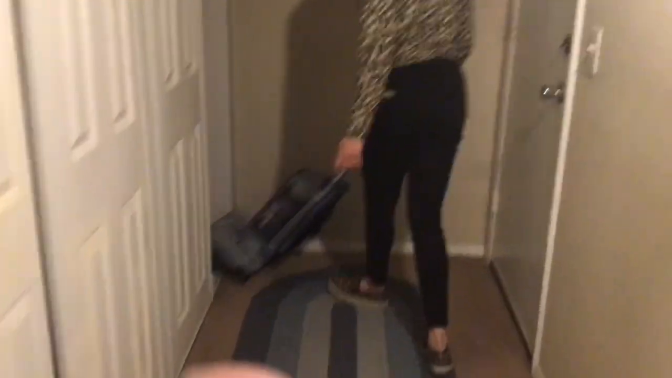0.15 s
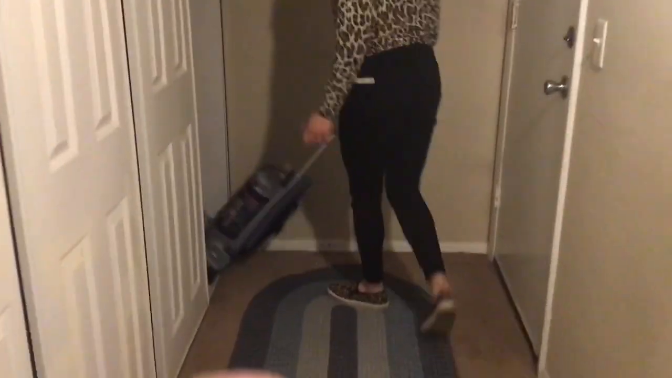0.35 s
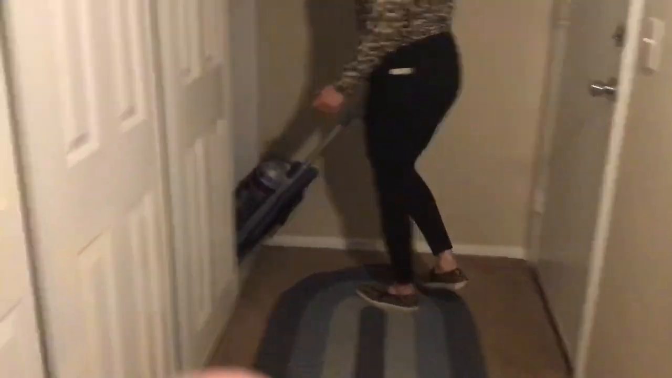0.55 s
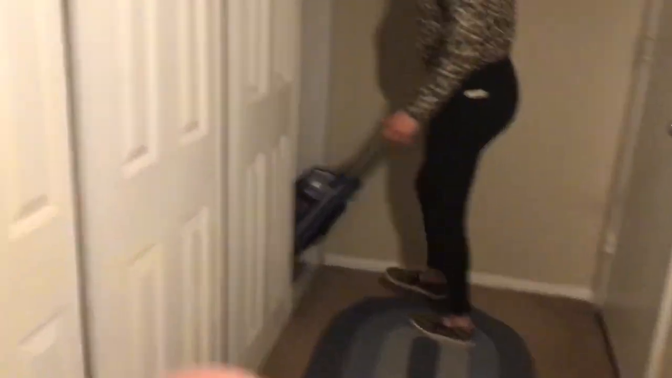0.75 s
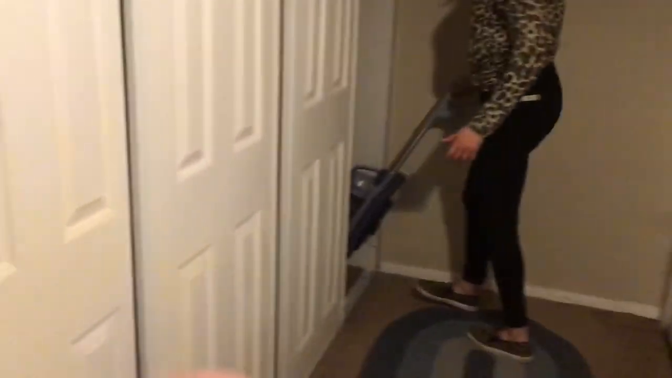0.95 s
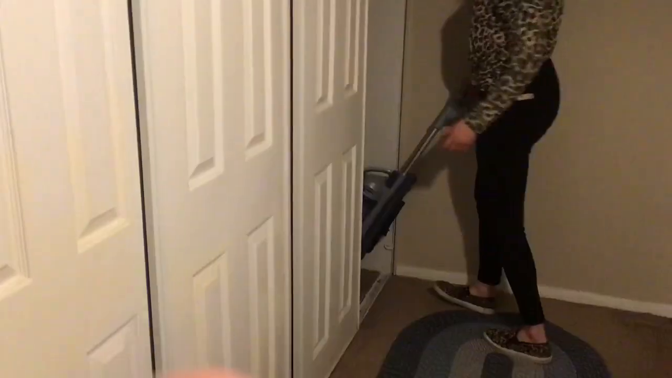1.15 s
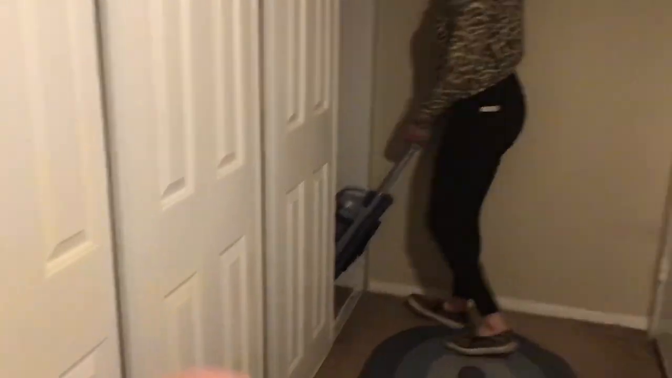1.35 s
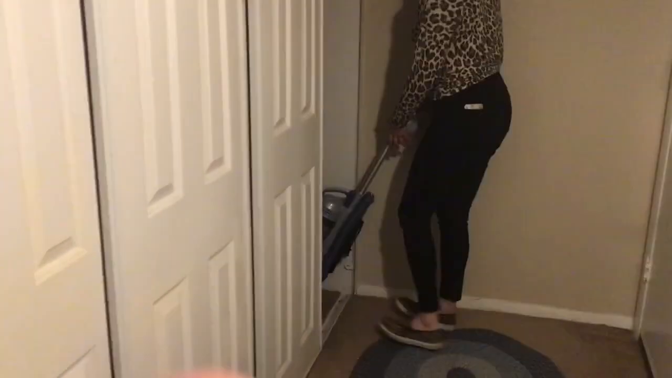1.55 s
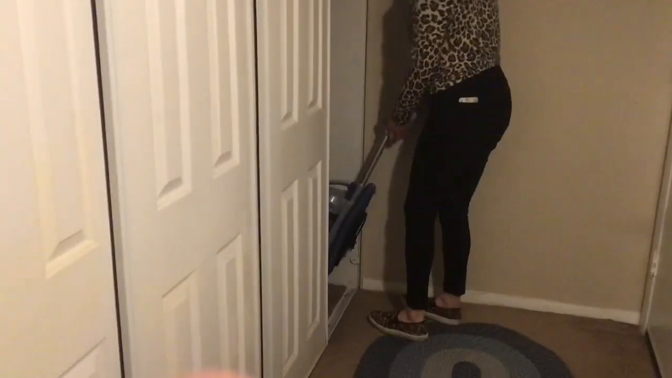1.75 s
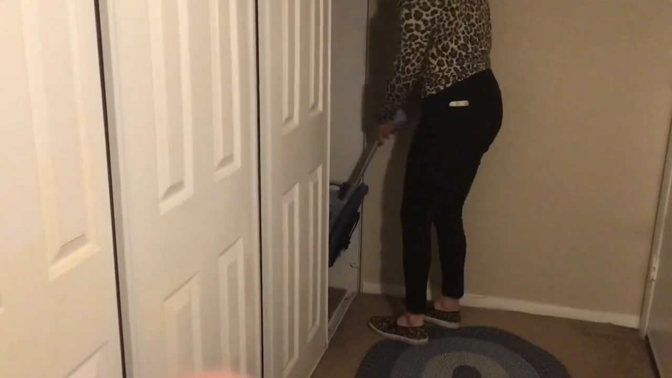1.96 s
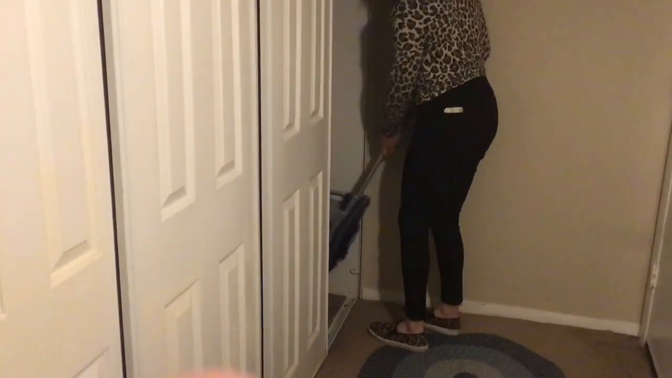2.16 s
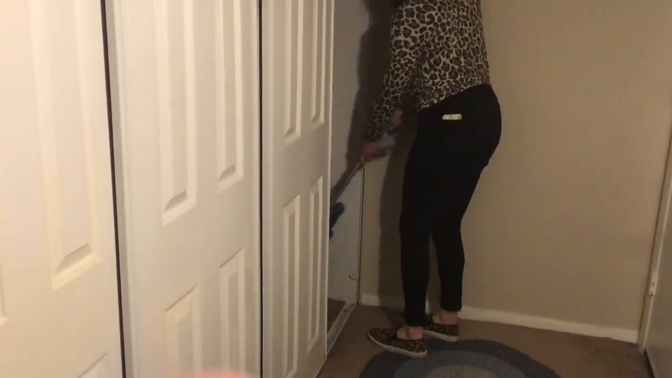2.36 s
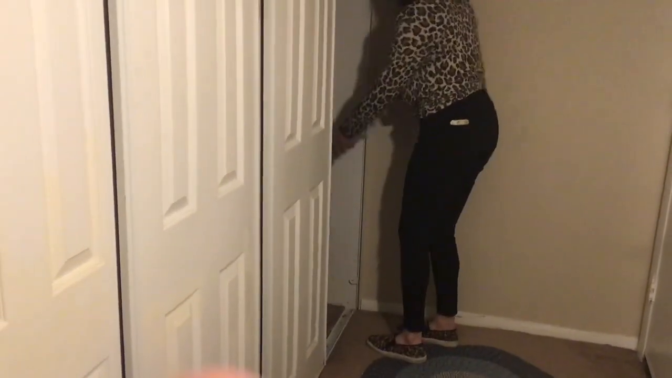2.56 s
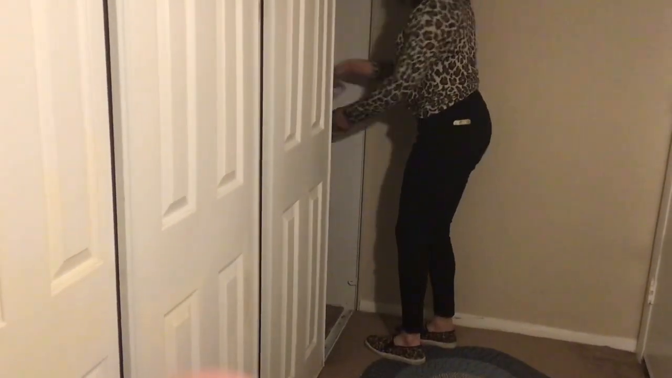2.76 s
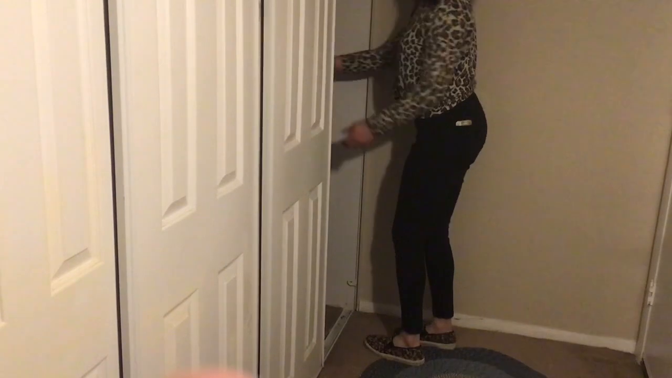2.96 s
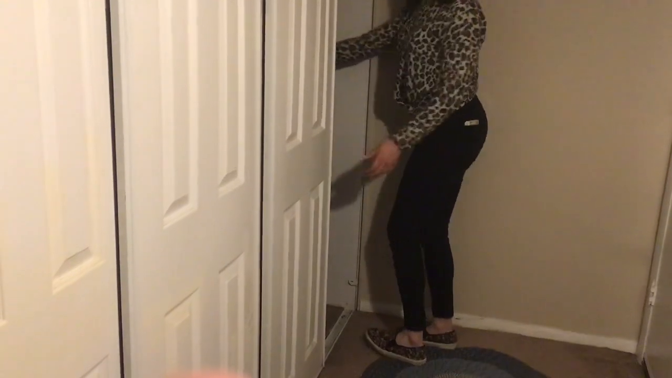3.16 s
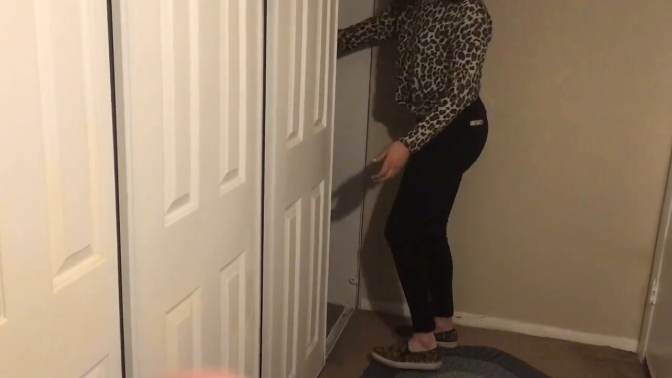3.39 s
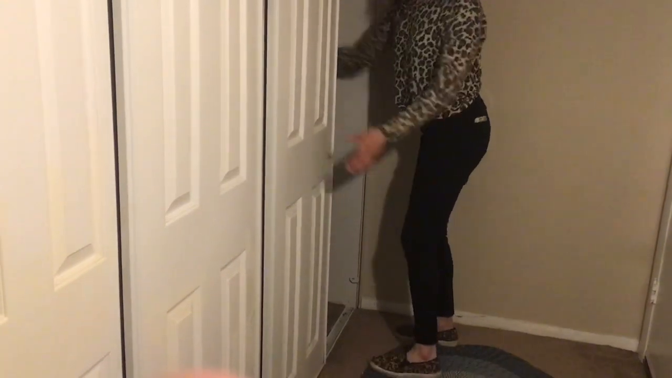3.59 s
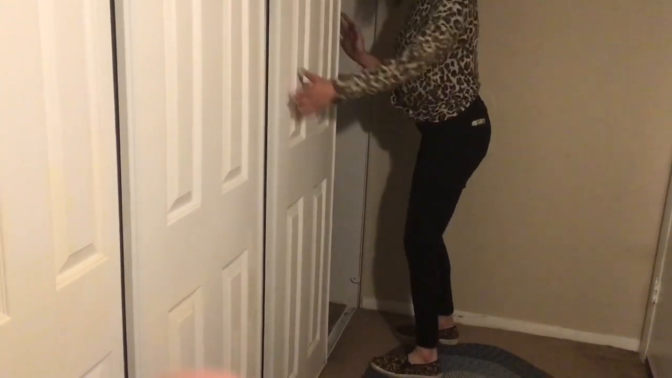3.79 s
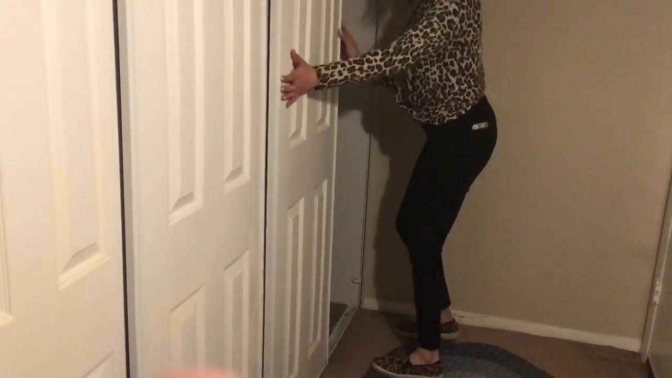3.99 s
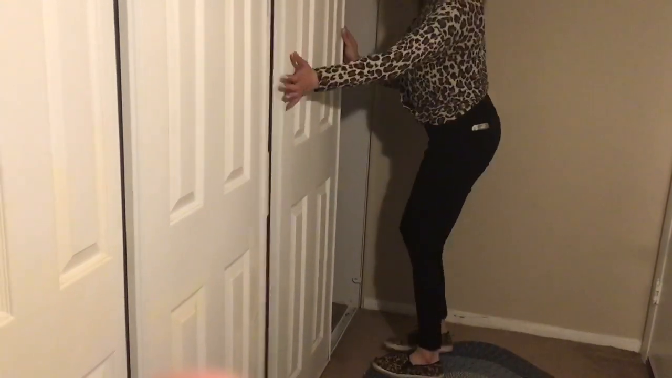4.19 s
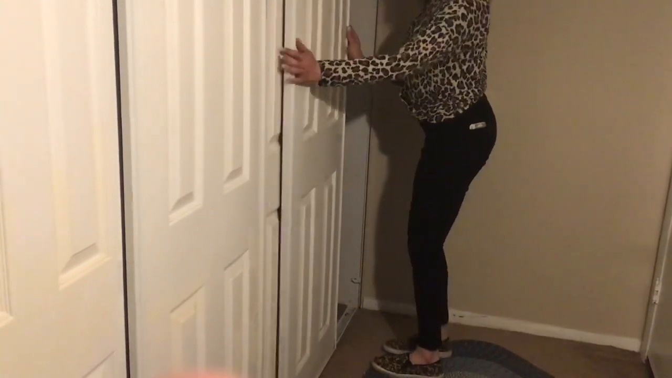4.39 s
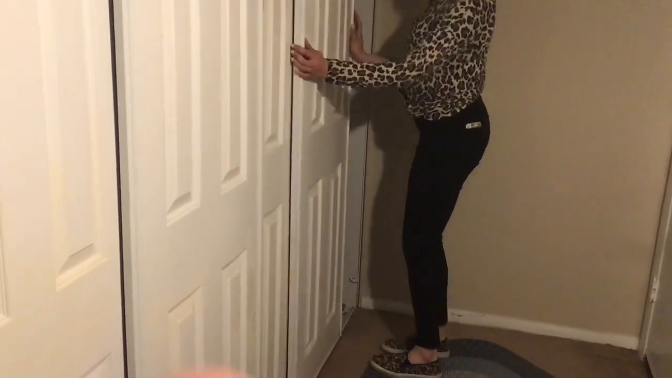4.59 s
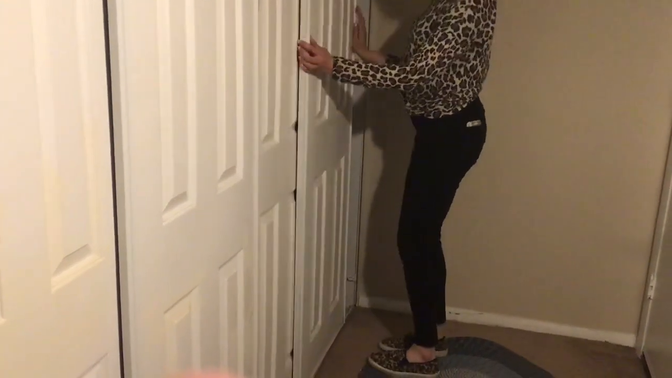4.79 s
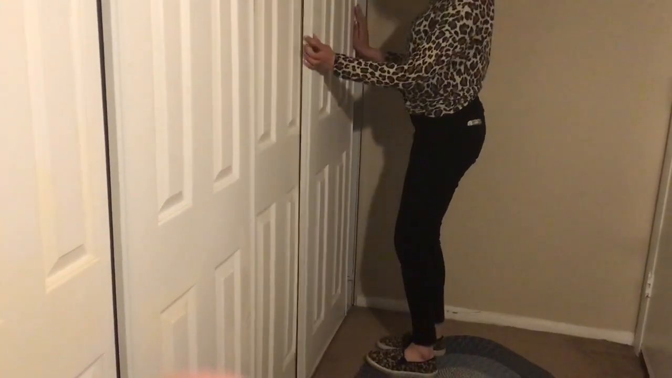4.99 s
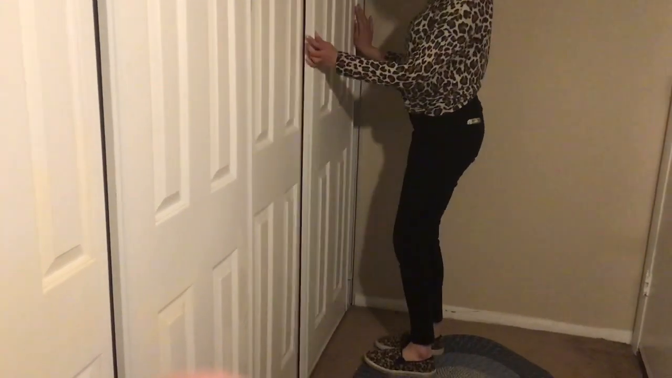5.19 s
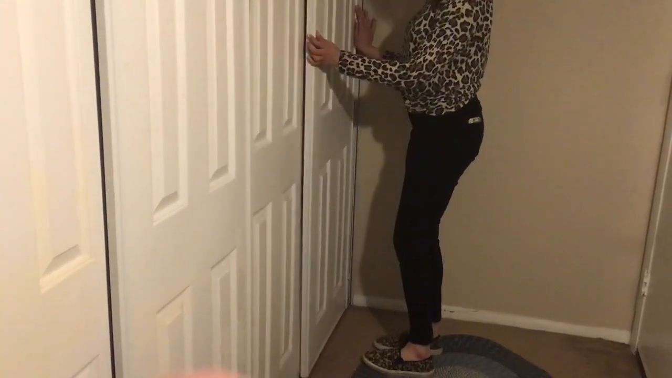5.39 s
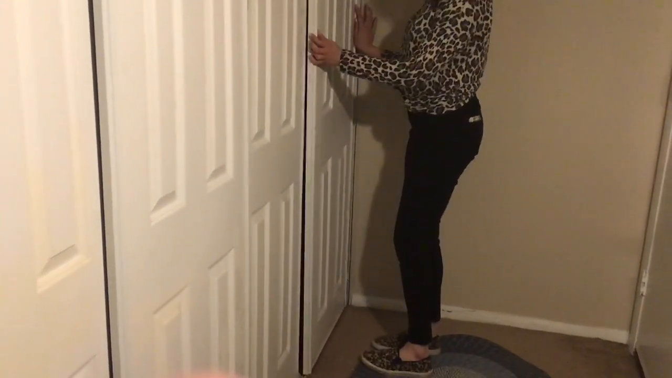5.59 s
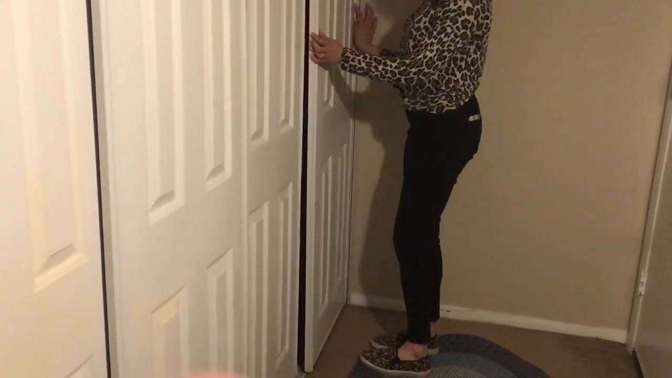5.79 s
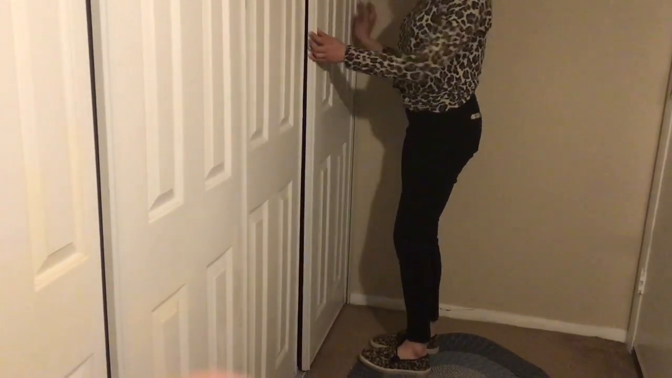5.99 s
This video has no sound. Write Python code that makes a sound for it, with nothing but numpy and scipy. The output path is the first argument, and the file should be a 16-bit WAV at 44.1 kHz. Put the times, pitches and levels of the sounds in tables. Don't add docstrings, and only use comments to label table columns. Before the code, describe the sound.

A vacuum cleaner thumps and clatters into a hallway closet, then hollow bifold doors roll along their track, squeak thinly and snap shut.

```python
import sys
import numpy as np
from scipy import signal
from scipy.fft import rfft, irfft
from scipy.io import wavfile
from scipy.ndimage import uniform_filter1d

SR = 44100
rng = np.random.default_rng(int(sys.argv[2]) if len(sys.argv) > 2 else 0)


def dump(signal):
    limited = np.clip(np.atleast_2d(signal).T, -1, 1)
    pcm = np.round(limited * 32767).astype(np.int16)
    wavfile.write(sys.argv[1], SR, pcm)


def voltage_ratio(level):
    return 10 ** (np.asarray(level, float) / 20)


N = 266496
T = np.arange(N) / SR

# (f/Hz, width/Hz, level/dB)
PANEL_MODES = [(165, 22, -1.5), (248.6, 13.5, -3), (300, 31, -7), (373, 56, -5), (487, 41, -17),
               (559, 46, -7.5), (615, 340, -5)]
# (f/Hz, width/Hz, level/dB)
SHELL_MODES = [(1097, 450, 2), (2120, 910, 6), (3200, 960, 6.5), (3814, 850, 4.5)]
# (f/Hz, width/Hz, level/dB)
TICK_MODES = [(5240, 630, -6), (6900, 850, -5.5), (8600, 1070, -1), (10800, 1900, 2), (13000, 5000, -4.5)]


def unit(x):
    return x / np.sqrt(np.mean(x ** 2))


def band(x, hz, width):
    return signal.lfilter(*signal.iirpeak(hz, hz / width, SR), x)


def walk(rate):
    k = int(SR / rate)
    steps = np.repeat(rng.standard_normal(N // k + 1), k)
    return 0.39 * uniform_filter1d(uniform_filter1d(steps, k), k)[:N]


def grit(spread_db, rate):
    return unit(rng.standard_normal(N) * voltage_ratio(spread_db * walk(rate)))


def body(x, modes, patchy_db=0, rate=20):
    total = 0
    for k, (hz, width, db) in enumerate(modes):
        level = voltage_ratio(db + patchy_db * walk(rate))
        total = total + (-1) ** k * level * band(x, hz, width) / np.sqrt(width)
    return total * np.sqrt(SR / np.pi / sum(voltage_ratio(2 * db) for hz, width, db in modes))


def add(out, s, piece):
    i = int(s * SR)
    out[i:i + len(piece)] += piece[:N - i]


def curves(table):
    s, *columns = np.transpose(table)
    gate = np.interp(T, [s[0] - .04, s[0], s[-1], s[-1] + .04], [0, 1, 1, 0])
    return [gate] + [np.interp(T, s, c) for c in columns]


def swell(times):
    return np.interp(T, times, [0, 1, 1, 0])


def whistle(hz, width, steady=0):
    lowpass = signal.butter(2, width / 2, fs=SR)
    slow = signal.lfilter(*lowpass, rng.standard_normal((2, len(hz) + 2000)))[:, 2000:]
    carrier = np.exp(2j * np.pi * np.cumsum(hz) / SR)
    return unit(np.real((steady + unit(slow[0]) + 1j * unit(slow[1])) * carrier))


def clacks():
    # (t/s, peak/dB, body/dB, tick/dB, ring f/Hz)
    bumps = [(0.103, -59, 8, -23, 1280), (0.181, -47, 3, -36, 1710), (0.4042, -41, 9, -17.5, 1940),
             (0.4337, -35.5, -24, -17, 1310), (0.4605, -23.5, -6, -22, 2010), (0.472, -39, -10, -7, 3330),
             (0.516, -40.5, 3, -34, 2430), (0.5309, -32.5, -4.5, -4, 1850), (0.552, -37, 1, -43, 1520),
             (0.5894, -48, 3, -25, 1780), (0.629, -49.5, -26, -27, 1410), (0.7, -43.5, -4, -16, 3200),
             (0.785, -47.5, 7, -18, 1600), (2.325, -31, -9, -27, 1480), (2.334, -39.5, 4.5, -24, 1480),
             (2.35, -62, -4, -17, 1900), (2.383, -48, -16, -8, 3200), (2.4094, -40.5, -4, -38, 1370),
             (2.425, -49, -4, -27, 2330), (2.44, -52.5, 2.5, -27, 1570), (2.4717, -39.5, -13, -4.5, 3170),
             (2.549, -41.5, 1, -10, 2500), (2.6034, -43, -16, -9, 3130), (2.6243, -39.5, -27, -13, 3050),
             (2.6616, -44.5, -32, 5.5, 3200), (2.733, -69.5, 11, -19, 600), (2.781, -56, 5, -18, 840)]
    # (t/s, peak/dB, body/dB, tick/dB, ring f/Hz)
    hinges = [(3.769, -65.5, 8, -9, 1350), (4.0293, -40, 1.5, -9.5, 2570), (4.045, -57, 11.5, -24, 1490),
              (4.1356, -50.5, -10, -8.5, 2800), (4.2984, -62, -5, 8, 1520), (4.3395, -43, 0.5, 1, 2950),
              (4.431, -47.5, 1, -6, 2930), (4.5324, -60, -12, -12, 3100), (4.592, -46.5, -8, -20, 2200),
              (4.6194, -43.5, 3.5, -16, 3240), (4.8707, -50, 5, 2, 2120), (4.968, -42, -22, 0.5, 3800),
              (4.9916, -46, 0.5, -2, 2920), (5.185, -48, -26, -20, 2530), (5.233, -45.5, -24, -14, 3060),
              (5.3764, -48.5, -31, -23, 1350), (5.724, -69, -13, 1, 1850), (5.7424, -55, -9, 3.5, 3270),
              (5.818, -36, -2.5, -8.5, 2630), (5.854, -42.5, -16, -8, 2620), (5.893, -49, -9, 3, 2560),
              (5.908, -41.5, -6, -22, 3460)]
    # (t/s, peak/dB, body/dB, tick/dB, contact/s)
    rattles = [(0.846, -58.5, -3.5, -2.5, 0.051), (0.903, -63.5, -2, -5.5, 0.05),
               (1.118, -57.5, -1, -13, 0.023), (1.224, -48, -8.5, -8, 0.018),
               (1.259, -50, -11.5, -11.5, 0.014), (1.409, -58, -10.5, -10.5, 0.048),
               (1.672, -56.5, -17, -17, 0.077), (1.707, -50.5, -11, -9, 0.027), (1.746, -65, -21, 2, 0.014),
               (2.015, -63.5, 9, -16, 0.0081), (2.148, -65, -14, 10, 0.0087),
               (2.9802, -55, -19.5, -19.5, 0.014), (3.160, -53, -15, -14, 0.015),
               (3.259, -63, -4.5, -4, 0.033), (3.292, -70, -6, -0.5, 0.014), (3.43, -66, 2, -13, 0.022),
               (3.943, -65, 1, 5.5, 0.085), (4.246, -53.5, -6, -8.5, 0.037), (5.588, -57.5, -18, -17, 0.02)]
    bump_s, hinge_s, shorter_oct_per_db = 0.018, 0.016, 0.008
    firm_ring_db, loose_ring_db = -1.0, -14
    knocks = []
    for rows, contact_s in ((bumps, bump_s), (hinges, hinge_s)):
        for row in rows:
            length = contact_s * 2 ** (-shorter_oct_per_db * (row[3] + 12))
            knocks.append((*row, length, firm_ring_db))
    for s, db, body_db, tick_db, length in rattles:
        hz = min(2500 * 2 ** (0.6 * (tick_db - body_db)), 3600)
        knocks.append((s, db, body_db, tick_db, hz, length, loose_ring_db))

    t = T[:6000]
    dull, shell, tick, ring = np.zeros((4, N))
    noise = grit(3.2, 430)
    sparkle = unit(voltage_ratio(6.0 * walk(300)))
    for s, db, body_db, tick_db, hz, length, ring_db in knocks:
        swelling = (1 - 0.84 * np.exp(-t / (0.41 * length))) * np.minimum(t / 0.00072, 1)
        shape = voltage_ratio(db) * swelling * np.exp(-(t / max(length, .002)) ** 1.09)
        add(dull, s, voltage_ratio(body_db) * shape)
        add(shell, s - .002, shape)
        add(tick, s - .002, voltage_ratio(tick_db) * shape * (0.73 + 0.59 * np.exp(-t / 0.0054)))
        grains = voltage_ratio(3.5 * np.repeat(rng.standard_normal(len(t) // 60), 60) - 2)
        rattle = shape * rng.standard_normal(len(t)) * grains
        broad = band(band(rattle, hz, 1520), hz, 1130)
        add(ring, s - .002, broad + voltage_ratio(ring_db) * band(rattle, hz, 196))
    dull = band(band(dull * rng.standard_normal(N), 480, 520), 475, 960)
    shell = voltage_ratio(-5.0) * body(shell * noise, SHELL_MODES) + voltage_ratio(5.5) * ring
    shell = signal.sosfilt(signal.butter(5, 4700, fs=SR, output="sos"), shell)
    return voltage_ratio(14.0) * dull + shell + voltage_ratio(-1.5) * body(tick * noise * sparkle, TICK_MODES)


def rings():
    # (t/s, peak/dB, f1/Hz, f2/Hz, f3/Hz)
    ringing_parts = [(0.4595, -33.5, 1146, 2690, 3300), (0.463, -38, 624, 1930, 2140),
                     (0.705, -56, 1450, 2610, 3230), (2.333, -42, 1114, 1460, 2040),
                     (0.5306, -34, 1150, 2370, 6900), (0.785, -61, 905, 2200, 3200),
                     (2.327, -50.5, 485, 1310, 1840), (2.661, -51, 3200, 4900, 5800),
                     (4.0293, -45.5, 594, 2730, 4450), (4.3403, -49.5, 3630, 4400, 4850),
                     (4.43, -54, 4130, 7400, 8000), (5.821, -40.5, 2550, 3130, 4120),
                     (5.854, -47, 2070, 2700, 3430), (5.908, -48, 2270, 3200, 4520)]
    shake_s, tilt_db_per_oct = 0.017, -4
    t = T[:6000]
    out = np.zeros(N)
    for s, db, *modes in ringing_parts:
        shake = rng.standard_normal(len(t)) * np.minimum(t / 0.0053, 1) * np.exp(-(t / shake_s) ** 2)
        for hz in modes:
            note = band(shake, hz, 60 + .03 * hz)
            level = voltage_ratio(db + tilt_db_per_oct * np.log2(hz / 2000))
            add(out, s - .002, level * note / np.max(np.abs(note)))
    return out


def ticks():
    # (t/s, peak/dB, f/Hz)
    contacts = [(.184, -45.5, 800), (.405, -40, 1880), (.5315, -41, 2400), (.70, -47, 3000),
                (0.784, -61, 1500), (1.226, -49, 2600), (1.438, -56, 2200), (1.445, -61, 1980),
                (2.734, -53, 565), (3.773, -58.5, 1186), (5.8215, -44, 2550), (5.91, -45, 3300),
                (3.161, -56, 3000), (4.341, -47, 4200), (4.342, -48, 2000), (4.384, -46, 1830),
                (4.6196, -51, 3160), (4.9696, -46.5, 3660), (4.9696, -49, 10500), (5.152, -65, 1510),
                (5.304, -56, 1830), (5.5926, -64, 9000)]
    t = T[:1500]
    out = np.zeros(N)
    for s, db, hz in contacts:
        burst = band(rng.standard_normal(len(t)) * np.exp(-t / .005), hz, 0.6 * hz)
        add(out, s - .001, voltage_ratio(db) * burst / np.max(np.abs(burst)))
    return out


def thumps():
    # (t/s, peak/dB, boom f/Hz, panel/dB)
    sill = [(0.009, -55, 82, 7), (0.192, -59, 100, 14.5), (0.404, -36.5, 111, -33), (0.421, -26.5, 64, -11),
            (0.481, -19, 53, -17), (0.505, -26, 56, -13), (0.549, -28, 87, -7), (0.6, -31, 75, -7.5),
            (0.799, -59, 109, -23), (1.199, -50, 97, -10.5), (1.235, -49, 96, -9), (1.368, -51.5, 97, -22),
            (1.762, -45.5, 102, -7)]
    # (t/s,
    # peak/dB, boom f/Hz, panel/dB)
    landing = [(2.247, -48, 82, -11), (2.314, -34, 77.3, -25), (2.375, -38.5, 84, -20),
               (2.41, -45.5, 125, 0), (2.458, -51.5, 88.5, 9), (2.570, -30.5, 100, -3.5),
               (2.59, -30, 77, -5.5), (2.613, -36, 75.4, 1), (2.663, -33.5, 74.2, -18),
               (2.699, -40.5, 77, -30), (2.768, -44.5, 70, -23), (3.602, -66.5, 72.5, 8.5)]
    # (t/s, peak/dB, boom f/Hz, panel/dB)
    slaps = [
        (3.773, -46.5, 100, -6),
        (3.936, -52.5, 101, -3),
        (4.042, -45, 89, 2),
        (5.497, -50, 74, -11),
        (5.683, -55.5, 90, -0.5),
        (5.82, -46.5, 131, 8.5),
        (5.846, -34, 96, -9.5),
        (5.875, -41.5, 85, -2.5),
        (5.93, -47.5, 113, 3.5),
    ]
    t = T[:22000]
    boom, push = np.zeros((2, N))
    for rows, t60, panel_hz in ((sill, 0.081, 164), (landing, 0.18, 240), (slaps, 0.12, 177.5)):
        for s, db, hz, panel_db in rows:
            turn = 2 * np.pi * hz * (t + 0.00063 * (1 - np.exp(-t / 0.017)))
            floor = np.sin(turn) * (1 - np.exp(-t / 0.0031)) * voltage_ratio(-60 * t / max(t60, .03))
            note = np.sin(2 * np.pi * panel_hz * t) * voltage_ratio(-60 * t / max(1.55 * t60, .03))
            add(boom, s - .004, -voltage_ratio(db) * (floor + voltage_ratio(panel_db - 4.5) * note))
            add(push, s - .003, voltage_ratio(db + panel_db) * (1 - np.exp(-t / 0.0029)) * np.exp(-t / 0.017))
    return voltage_ratio(4.0) * boom + voltage_ratio(1.0) * body(push * rng.standard_normal(N), PANEL_MODES)


def pops():
    # (t/s, peak/dB, f/Hz)
    pushes = [
        (2.4129, -27.5, 264),
        (2.582, -22.5, 115),
        (2.606, -32.5, 260),
        (3.775, -48.5, 300),
        (5.859, -32, 149),
    ]
    t = T[:1600] - T[800]
    out = np.zeros(N)
    for s, db, hz in pushes:
        add(out, s - T[800], -voltage_ratio(db) * np.cos(2 * np.pi * hz * t) * np.exp(-(2.06 * hz * t) ** 2))
    return out


def doors():
    # (t/s, jolt level/dB, drag of the guide on the rail level/dB); jolts follow the speed
    roll = [
        (4.2, -64, 3),
        (4.29, -47.5, 0),
        (4.5, -42, -0.5),
        (4.69, -41, 3),
        (4.95, -42.5, -1.5),
        (5.08, -46.5, -1.5),
        (5.36, -50.5, 1.5),
        (5.52, -58, 4.5),
        (5.8, -53, 2.5),
    ]
    # (f/Hz, width/Hz, level/dB)
    frame_modes = [(62, 45, -6.5), (90.4, 20.5, -1), (116, 49, -5), (163, 39.6, -3.5), (195, 19, -2),
                   (251, 17, -6.5)]
    # (f/Hz, width/Hz, level/dB)
    leaf_modes = [(328, 31, 0), (383.5, 29, 1), (421, 36, -2), (482, 38, -5), (580, 105, -4.5),
                  (707, 41, -4), (776, 97, -12), (1035, 130, -22)]
    # (f/Hz, width/Hz, level/dB)
    track_modes = [(1035, 1110, 3.5), (1850, 1900, 7), (2830, 470, 0.5), (3270, 250, -7), (3820, 370, -4),
                   (5000, 500, -29)]
    # (f/Hz, width/Hz, level/dB)
    guide_modes = [(6770, 620, -6.5), (8400, 810, 0), (10800, 2000, 7), (11940, 2200, -1.5)]
    # (level/dB at -40 dB of jolt, dB per dB)
    leaf_law, track_law, guide_law = (-43.5, 1.77), (-48.5, 0.96), (-66.5, 0.23)
    gate, jolt_db, drag_db = curves(roll)
    frame = gate * voltage_ratio(jolt_db)
    panel, track, hiss = (gate * voltage_ratio(db + slope * (jolt_db + 40)) for db, slope in (leaf_law, track_law, guide_law))
    hiss = hiss * np.interp(T, (4.3, 4.73), [0.35, 1])
    settle = curves([(6,), (6.2,)])[0] * voltage_ratio(-46 - 52 * (T - 6))
    frame = frame + settle
    panel = panel + voltage_ratio(-10.0) * settle
    track = track + voltage_ratio(-10) * settle
    jolts = grit(3.0, 150)
    low = frame * body(jolts, frame_modes) + panel * body(jolts, leaf_modes, 2.6, 40)
    rail = body(jolts * voltage_ratio(3.5 * walk(400)), track_modes, 2.5, 30)
    rail = voltage_ratio(drag_db + 2.0 * walk(9)) * track * rail
    return low + rail + hiss * body(grit(11.0, 40), guide_modes, 2.9, 22.28)


def sing():
    # (t/s, f/Hz)
    whistle_path = [
        (4.5, 10350),
        (4.8, 10800),
        (5.0, 10560),
        (5.12, 10650),
        (5.2, 11300),
        (5.33, 10300),
    ]
    # (t/s, length/s, level/dB, first f/Hz, last f/Hz)
    streaks = [(4.375, 0.061, -65, 1900, 1910), (4.454, .06, -63, 2030, 2070),
               (4.64, 0.051, -74, 2600, 2500), (4.77, 0.055, -67, 2500, 2480),
               (4.87, 0.064, -67, 3300, 3200), (4.422, 0.12, -65, 3050, 3180),
               (4.607, 0.13, -63, 3220, 3160), (4.69, 0.06, -64, 2110, 2150),
               (4.728, 0.072, -71, 3750, 3800), (5.11, 0.25, -69.5, 1500, 1490),
               (5.153, 0.13, -67, 3330, 3200), (5.175, 0.055, -63, 2660, 2600),
               (5.3, 0.13, -66, 1806, 1795), (5.3, 0.13, -88, 3960, 3880), (5.368, 0.034, -67, 1340, 1240),
               (5.43, 0.088, -72, 1810, 1810), (5.445, 0.12, -77, 3500, 3610),
               (5.493, 0.156, -65, 1990, 2010), (5.53, 0.074, -75, 2300, 2400),
               (5.542, 0.06, -70, 1310, 1250), (5.551, 0.14, -76, 3480, 3750),
               (5.502, .08, -75, 3690, 3700), (5.57, 0.083, -70, 3380, 3350),
               (5.667, 0.075, -67, 1990, 1960), (5.75, 0.066, -72, 1950, 1900),
               (5.66, 0.06, -73, 3550, 3540), (4.55, 0.17, -81, 8400, 8400), (4.87, 0.22, -82, 8600, 8150),
               (5.166, 0.094, -77, 8500, 8400), (5.147, 0.074, -80, 9500, 9400),
               (5.751, .04, -67.5, 3270, 3250)]
    # (t/s, length/s, level/dB, first f/Hz, last f/Hz)
    hums = [(0.0, 0.092, -53.5, 178, 168), (0.0, 0.055, -58, 542, 557), (0.195, 0.041, -52, 262, 352),
            (0.27, 0.071, -53.5, 180, 183), (0.58, 0.12, -59, 231, 235.3), (4.5, 0.061, -53, 355, 414),
            (4.56, 0.063, -57, 195, 198), (4.61, 0.077, -48, 408, 345), (4.62, 0.167, -51.5, 580, 495),
            (4.72, 0.073, -46.5, 202.7, 195), (5.35, 0.14, -50, 195, 183.3), (5.92, 0.05, -49.5, 344, 344),
            (5.94, 0.051, -51, 195, 193)]
    streak_width_hz, hum_width_hz = 120, 27.6
    path = np.interp(T, *np.transpose(whistle_path)) + 200 * walk(8.3)
    level = swell((4.5, 4.75, 5.24, 5.33)) * voltage_ratio(-75 + 2.6 * walk(25))
    out = level * whistle(path, 600)
    notes, t = np.zeros(N), T[:8000]
    for rows, width in ((streaks, streak_width_hz), (hums, hum_width_hz)):
        for s, length, db, first_hz, last_hz in rows:
            along = t / max(length, .02)
            shape = np.clip(6.2 * np.minimum(along, 1 - along), 0, 1)
            hz = first_hz + (last_hz - first_hz) * np.minimum(along, 1)
            steady = 1.8 * (s > 5.1)
            add(notes, s, voltage_ratio(db) * shape * whistle(hz, width, steady))
    return out + notes * voltage_ratio(1.5 * walk(45))


def squeaks():
    # (t/s, peak/dB, f/Hz, t60/s, rise/s)
    slips = [(5.31, -76, 8700, 0.23, 0.022), (5.308, -75, 10600, 0.055, .008),
             (5.325, -67, 10300, 0.07, 0.0087), (5.35, -46, 10040, 0.13, 0.0042),
             (5.416, -50, 9850, 0.092, 0.0073), (5.427, -36.5, 9810, 0.097, 0.0059),
             (5.43, -43, 9520, .06, 0.0046), (5.468, -46.5, 9400, 0.16, 0.0041),
             (5.51, -64, 9370, 0.14, .006), (5.634, -57, 9870, 0.17, 0.011),
             (5.652, -47.5, 9800, 0.069, 0.011), (5.72, -59, 10000, .05, .01)]
    side_db = -13
    t = T[:12000]
    out = np.zeros(N)
    for s, db, hz, t60, rise in slips:
        wobble = np.cumsum(uniform_filter1d(rng.standard_normal(len(t)), 200)) * 6000 / SR
        shape = np.minimum(t / max(rise, .001), 1) ** 2 * voltage_ratio(-60 * np.maximum(t - rise, 0) / t60)
        sides = np.sin(2 * np.pi * (hz - 300) * t + 2 * wobble)
        sides = sides + 0.5 * band(rng.standard_normal(len(t)), hz - 150, 800)
        tone = np.sin(2 * np.pi * hz * t + wobble)
        add(out, s, voltage_ratio(db) * shape * (tone + voltage_ratio(side_db) * sides * np.exp(-t / 0.03)))
    return out


def shuffle():
    # (t/s, weight on the boards level/dB, slip level/dB)
    steps = [(0.0, -55.5, -6.5), (0.28, -56, -3.5), (0.55, -55.5, -8), (0.66, -59, -5), (0.85, -59.5, -8.5),
             (0.97, -66.5, -6), (1.28, -67, 0), (1.6, -78, 0), (1.74, -63.5, -12.5), (1.98, -64, -7),
             (2.2, -71.5, 1.5), (2.4, -60, 5.5), (2.58, -52, -12), (2.74, -69, 4.5), (3.0, -73, -6.5),
             (3.87, -74, -2.5), (4.12, -52.5, -6.5), (4.2, -54, -18)]
    # (f/Hz, width/Hz, level/dB)
    floor_modes = [(53, 37, -5.5), (66, 10, 2), (100, 2.7, -2.5), (127, 70, -7.5)]
    gate, weight_db, slip_db = curves(steps)
    scrape_db = weight_db + slip_db
    rumble = gate * voltage_ratio(weight_db)
    knock = gate * voltage_ratio(weight_db - 0.5)
    scrape = gate * voltage_ratio(scrape_db)
    hiss = gate * voltage_ratio(-73.5 + 0.74 * (scrape_db + 64.5))
    knocks = grit(3.0, 70)
    low = rumble * body(grit(2.5, 25), floor_modes) + knock * body(knocks, PANEL_MODES)
    rub = grit(5.0, 60)
    return low + scrape * body(rub, SHELL_MODES) + hiss * body(rub, TICK_MODES)


def house():
    # (f/Hz, level/dB per Hz)
    spectrum = [(15, 3), (40, 6.5), (80, -2.5), (169, 1), (315, -8), (569, -12.5), (1000, -29.5),
                (1460, -26.5), (2310, -32), (3960, -28), (5930, -34.5), (11300, -34), (15600, -38.5)]
    hz, db = np.transpose(spectrum)
    f = np.maximum(np.fft.rfftfreq(N, 1 / SR), 1)
    colour = voltage_ratio(np.interp(np.log(f), np.log(hz), db))
    return voltage_ratio(-65.5) * unit(irfft(rfft(rng.standard_normal(N)) * colour, N))


def hall(x, wet_db):
    # (f/Hz, t60/s)
    decay = [(100, 0.4), (500, 0.34), (2000, 0.17), (6000, 0.15), (12000, 0.17)]
    t = T[:40000]
    hz, t60 = np.transpose(decay)
    tail = 0
    for f in 60 * 2 ** np.arange(9.):
        fade_s = np.interp(np.log(f), np.log(hz), np.minimum(t60, .6))
        tail = tail + band(rng.standard_normal(len(t)), f, f * 0.9) * voltage_ratio(-60 * t / fade_s)
    tail = tail * np.clip((t - .002) / 0.0033, 0, 1)
    return x + voltage_ratio(wet_db) * signal.fftconvolve(x, tail / np.sqrt(np.sum(tail ** 2)))[:N]


def starve(x):
    def power_db(v):
        return 10 * np.log10(uniform_filter1d(v ** 2, 1500) + 1e-14)

    squeal_db = power_db(band(band(x, 9650, 700), 9650, 700))
    below_db = power_db(band(band(x, 7500, 700), 7500, 700))
    tonal = np.clip((squeal_db - below_db - 15) / 5, 0, 1)
    share = tonal * np.clip((squeal_db + 59) / 8, 0, 1)
    share = np.maximum(share, .6 * np.roll(share, int(.045 * SR), axis=-1))
    top = signal.sosfiltfilt(signal.butter(12, 10350, "high", fs=SR, output="sos"), x)
    return x - (1 - voltage_ratio(-30 * share)) * top


def scene():
    drier = thumps() + pops() + squeaks() + doors()
    clatter = clacks() + rings() + ticks()
    return (hall(clatter, -9.0) + hall(drier, -10.0) + sing() + shuffle() + house())[None]


def top_cut(x):
    return signal.sosfilt(signal.butter(12, 15780, fs=SR, output="sos"), x)


def record(dry):
    mix = signal.sosfilt(signal.ellip(10, .2, 60, 15750, fs=SR, output="sos"), dry)
    mix = starve(mix)
    mix = signal.sosfilt(signal.butter(6, 50, "high", fs=SR, output="sos"), mix)
    return top_cut(mix)


dry = scene()
out = record(dry)
dump(out)
```